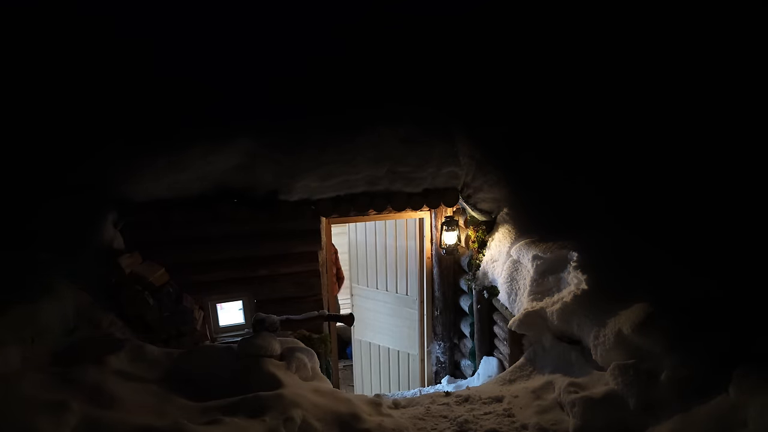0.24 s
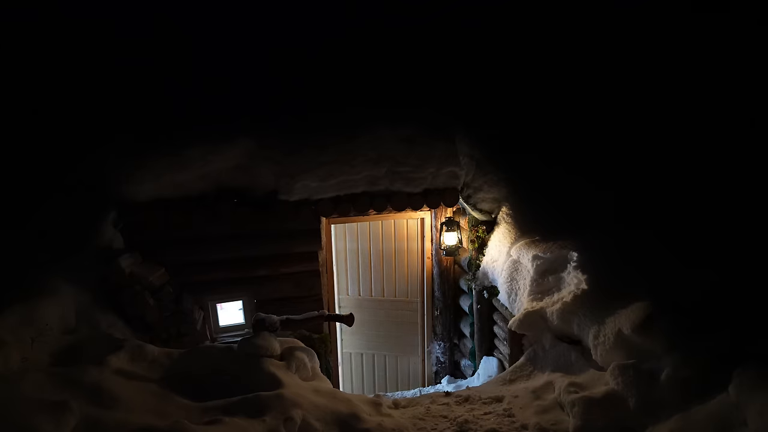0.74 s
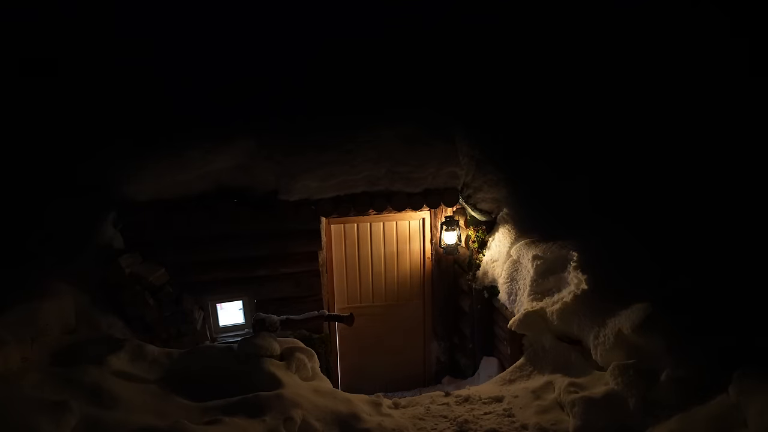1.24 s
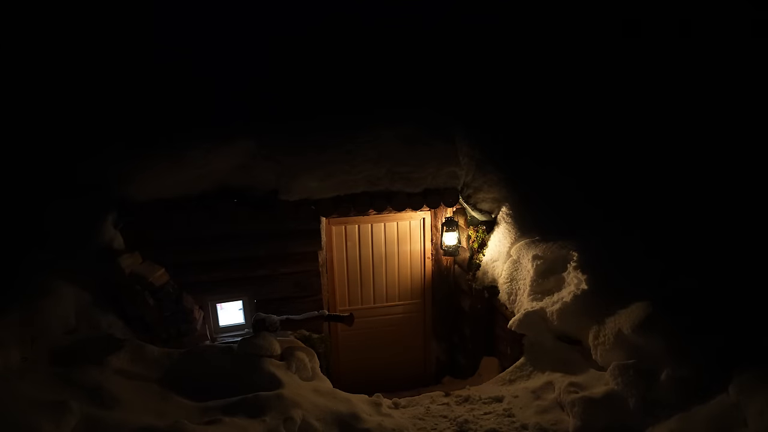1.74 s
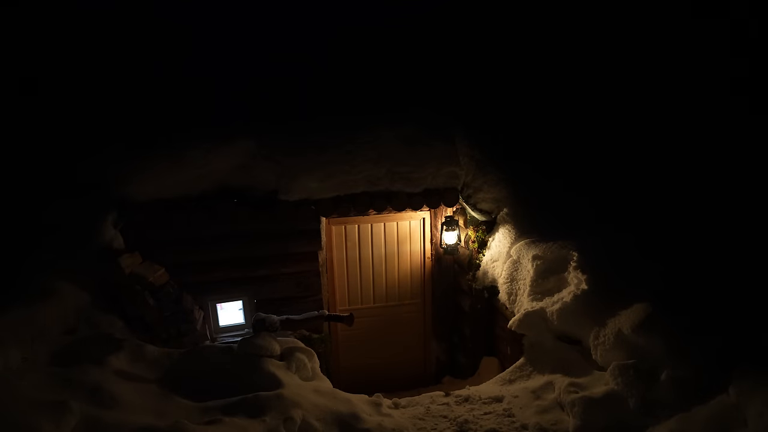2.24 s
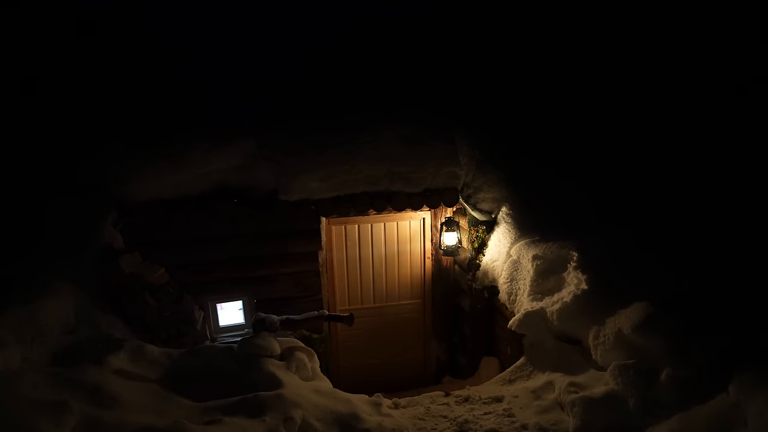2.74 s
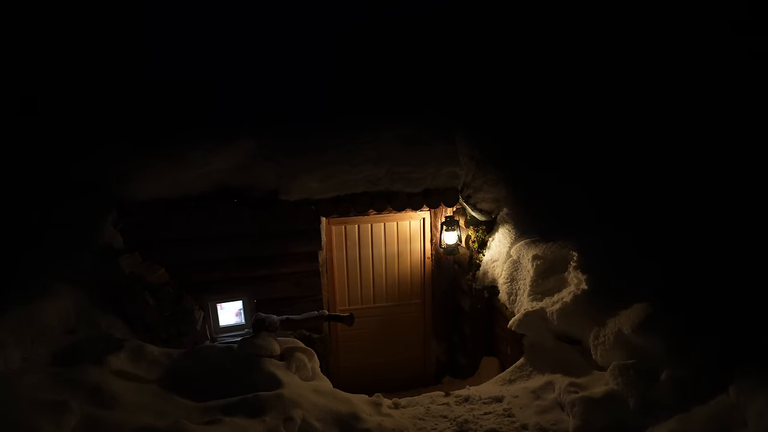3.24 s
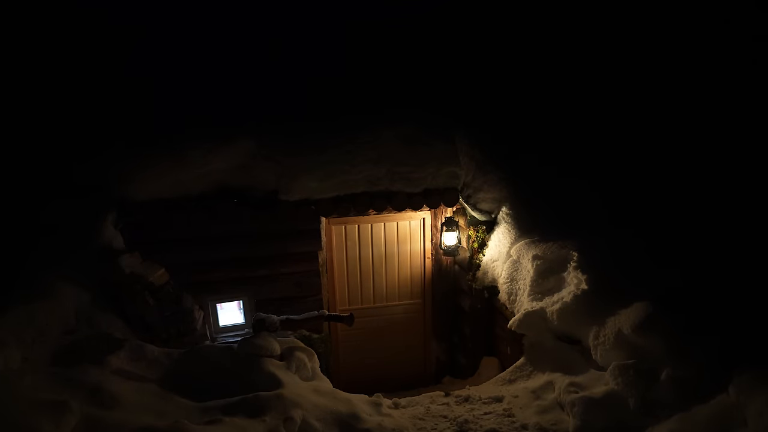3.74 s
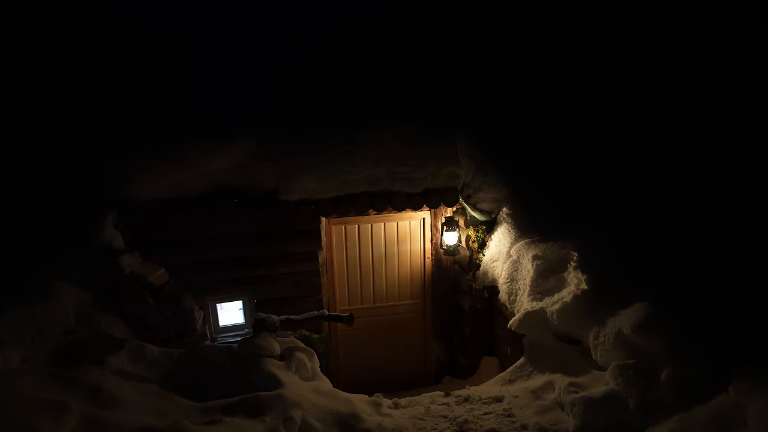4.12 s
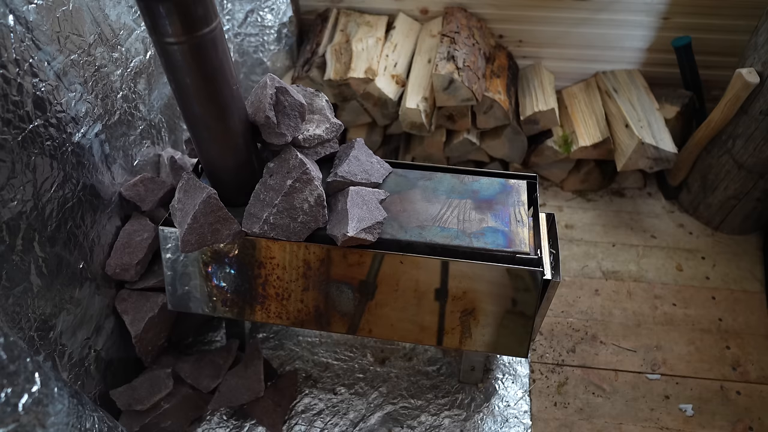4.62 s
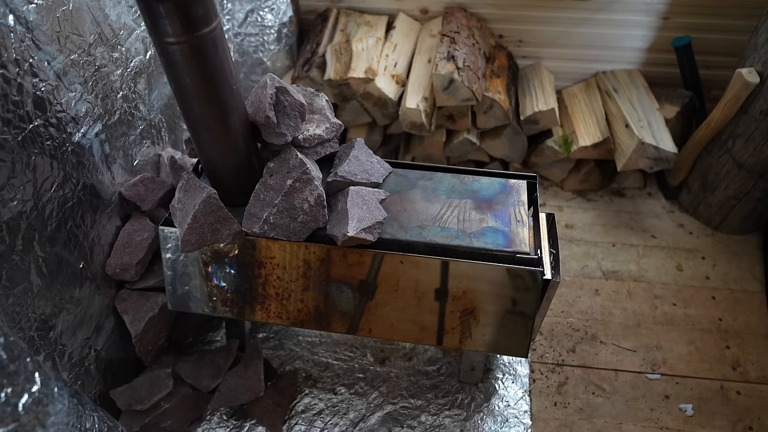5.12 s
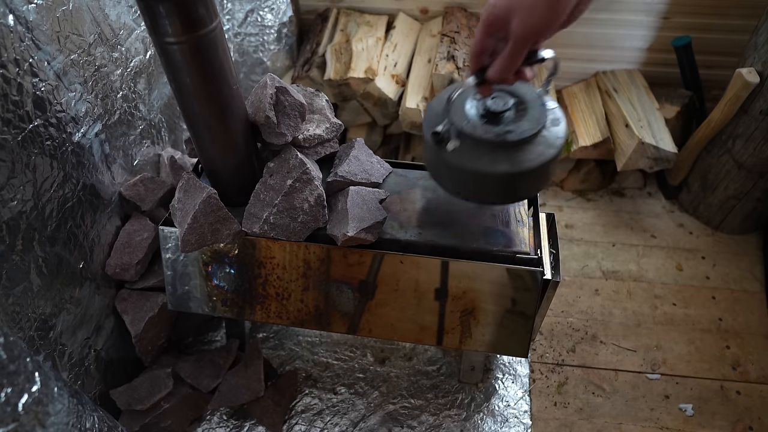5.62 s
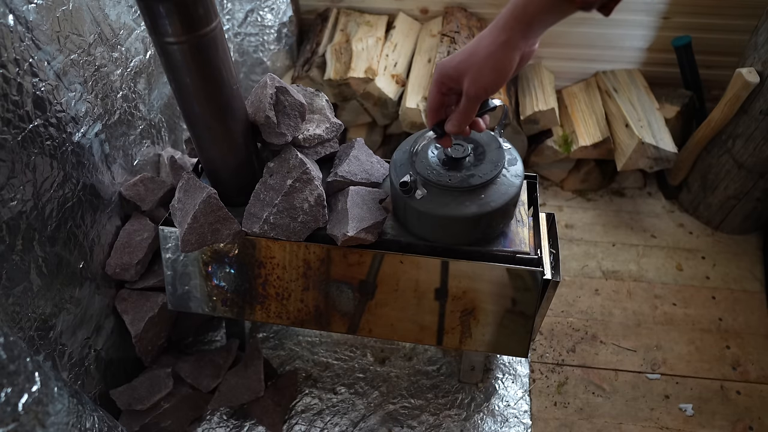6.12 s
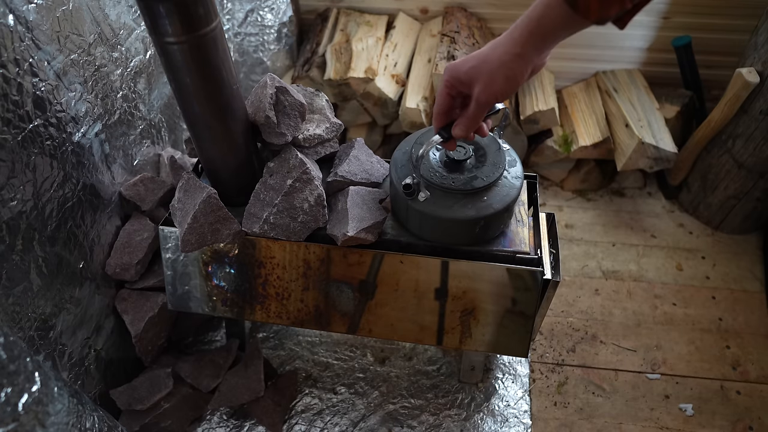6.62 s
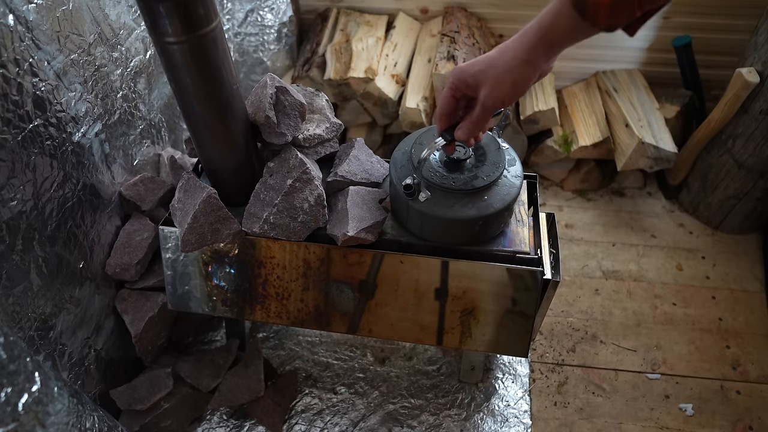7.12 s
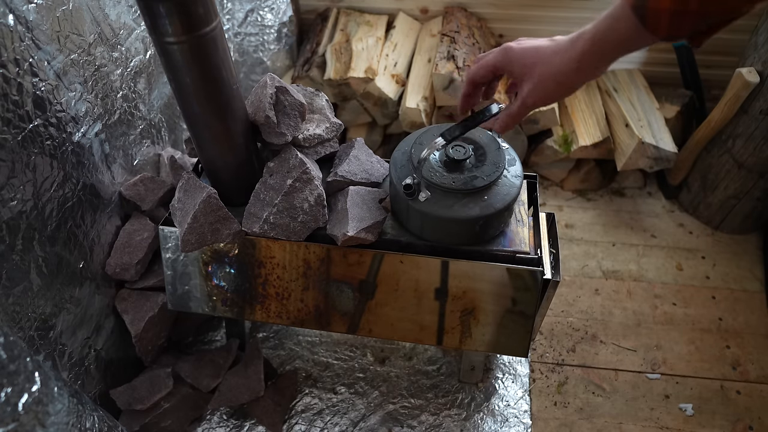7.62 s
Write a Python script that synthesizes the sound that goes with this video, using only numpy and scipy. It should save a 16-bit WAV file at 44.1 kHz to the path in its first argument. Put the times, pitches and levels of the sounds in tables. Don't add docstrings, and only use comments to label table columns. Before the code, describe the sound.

Very quiet start with low rumble, boots in snow and brittle ticks, then a heavy wooden door thumps twice, its edge juddering against the frame. Quiet settling follows. The scene jumps inside to a small room with faint fire and sleeve rustle, a step on boards, and a kettle set on hot metal: steam erupts, hissing, spitting and crackling in uneven surges, with a hard knock near the end. Close and dry, in stereo.

```python
import sys
import numpy as np
from scipy import signal
from scipy.io import wavfile

SR = 44100
rng = np.random.default_rng(int(sys.argv[2]) if len(sys.argv) > 2 else 0)


def makeup_ratio(level_db):
    decades = np.asarray(level_db, float) / 20
    return 10 ** decades


def master_out(mix):
    frames = np.transpose(np.atleast_2d(mix))
    ceiling = np.clip(frames, -1, 1)
    pcm = np.round(ceiling * 32767).astype(np.int16)
    wavfile.write(sys.argv[1], SR, pcm)


N = 347067
CUT_S = 4.24

# peak time in seconds, peak in dB, rise in seconds,
# fall in seconds per 20 dB, fine fizz against the jet in dB.
FLASHES = [(5.8435, -25.5, .005, 0.4, 0), (5.97, -30.5, .12, .35, -1), (6.095, -32, .04, 0.3, -7),
           (6.194, -22, 0.04, 0.2, -6), (6.225, -22.5, .06, .2, -7), (6.305, -24.5, 0.17, 0.34, -4),
           (6.455, -26.5, .05, 0.21, 5), (6.56, -28.5, 0.28, 0.25, -2), (6.64, -26.5, 0.1, .17, -4.5),
           (6.739, -25.5, .012, 0.24, -2), (6.94, -36, .12, .45, 0.3), (7.012, -27, .012, .1, 1),
           (7.036, -23.5, .06, .18, -0.6), (7.19, -29.5, .1, 0.44, -5), (7.33, -33, 0.33, 0.7, 5),
           (7.51, -28, 0.2, 0.32, 1.5), (7.59, -32, .05, .2, 10), (7.647, -22.5, .1, 0.11, -1),
           (7.73, -27, 0.15, 0.2, -2), (7.82, -28.5, .25, .62, 4.5)]
# time in seconds, peak in dB.
SPITS = [(6.3134, -8), (6.347, 3), (6.385, 2), (6.463, -2), (6.175, 1), (6.201, -6), (6.226, -4),
         (6.525, -10), (6.575, -8), (6.64, -8), (6.897, -20), (7.27, -10), (7.497, -8), (7.523, -10),
         (7.735, -8), (6.927, -10), (7.008, -3), (7.037, -3), (6.9471, -9), (7.3427, -29), (7.5822, -37),
         (7.7024, -22), (7.8594, -20)]
# time in seconds, drive in dB.
PRESS = [
    (5.9, -2.5),
    (6.22, 3),
    (6.7, 1),
    (6.9, 7.5),
    (7.15, -3.5),
    (7.55, -5),
    (7.72, 2.5),
]
# frequency in Hz, level in dB per Hz.
JET = [(35, -54), (60, -34), (165, -11), (271, -22), (363, -12), (596, -15.5), (1250, -5), (1430, -5),
       (1720, -14), (2100, -5), (2600, -5.5), (3300, -4), (13000, -5.5)]
# frequency in Hz, correlation from -1 to 1.
JET_ALIKE = [(60, 0.99), (180, 1), (550, 0.91), (1650, 0.61), (4970, 0.27), (15000, 0.04)]
# frequency in Hz, width in Hz,
# level in dB, centre in seconds, spread in seconds.
KETTLE_AND_PLATE = [(3760, 22, 0, 6.5, 0.27), (1090, 90, 10, 6.235, 0.04), (1245, 22, 6, 6.5, 0.4),
                    (1246, 14, 16, 7.4, 0.55), (1680, 93, 4, 6.4, 0.3), (2140, 98, 6, 5.92, 0.089),
                    (3080, 40, 5, 6.6, 0.2), (3060, 45, 4, 7.3, .5), (5200, 200, 3, 7.62, .1),
                    (2900, 500, 0, 6.4, .1), (3420, 60, 4, 5.9, .07), (3100, 40, -3, 6.5, 0.13),
                    (3260, 100, -3, 7.66, 0.05), (5300, 260, 3, 6.57, 0.2), (970, 110, 8, 7.06, 0.045),
                    (430, 40, 4, 5.95, .1), (1000, 150, 3, 5.95, .12), (1500, 200, 3, 5.9, .08),
         (780, 120, 9, 7.715, .025), (370, 60, 10, 7.72, .03), (200, 60, 6, 7.2, .2),
         (175, 30, 5, 6.27, .06), (430, 30, 3, 6.33, .12), (1240, 60, 6, 6.23, .04),
         (980, 40, 6, 6.36, .04), (1150, 50, 6, 6.36, .04), (340, 40, 4, 6.43, .04), (775, 25, 6, 6.55, .1),
         (400, 60, 5, 6.635, .015), (1000, 250, 5, 6.738, .01), (450, 60, 8, 6.8, .04),
         (670, 50, 6, 6.81, .04), (1750, 60, 3, 6.8, .08), (430, 60, 5, 6.945, .02),
         (1150, 60, 4, 6.96, .03), (1720, 120, 2, 7.02, .02), (1000, 200, 5, 7.5, .012),
         (950, 100, 3, 7.835, .02)]
# frequency in Hz, width in Hz, level in dB.
KETTLE_WALLS = [(1750, 22, -2), (2230, 25, -10), (3020, 40, -2), (3430, 30, -7), (3775, 30, -3),
                (4460, 60, -7), (4830, 45, -3), (5185, 60, -1), (5405, 35, -1), (5940, 50, -6),
                (6690, 60, -5), (8035, 30, -1), (8880, 40, -7), (13690, 60, -2)]
FIZZ_FALL = 0.79
PLATE_LAG_S, BODY_LAG_S = 0.044, 0.018


def steam():
    wet = slice(int(5.8 * SR), N)
    flow = bursts(FLASHES)[0]
    fine, fine_db = bursts(FLASHES, FIZZ_FALL)
    press_db = np.interp(np.arange(N) / SR, *np.transpose(PRESS))
    plate_db = press_db + 1.3 * lagging_db(flow, PLATE_LAG_S)
    body_db = 0.8 * lagging_db(flow, BODY_LAG_S)

    frying = grains(3000, spread_db=4.2)
    jet = bands(JET, JET_ALIKE, (5.8, 8), patchy_db=1.36, flicker=22.0, grit=.5 * frying,
                tilt=[(300, plate_db), (1300, body_db), (4000, 0 * body_db)])
    close = .7 * jet[:, wet] + .3 * jet[::-1, wet]
    ringing = sum(makeup_ratio(level_db) * resonance(close, hz, width) for hz, width, level_db in KETTLE_WALLS)
    jet[:, wet] = waking(jet[:, wet], 5.8, KETTLE_AND_PLATE) + ringing
    jet = signal.sosfilt(signal.butter(2, 55, "high", fs=SR, output="sos"), jet)

    small = decaying(np.abs(grains(90, spread_db=2.5)), 0.0052)
    sputter = makeup_ratio(0.7 * drift(60.)) + 0.17 * np.minimum(small / np.std(small), 3)
    kicks = np.zeros(N)
    kicks[[round(s * SR) for s, _ in SPITS]] = makeup_ratio(np.array(SPITS)[:, 1] - 23)
    spits = decaying(kicks, 0.0073)

    fizz = rng.standard_normal((2, N)) + 0.9 * frying
    fizz = rms_one(signal.sosfilt(signal.butter(4, 13000, "high", fs=SR, output="sos"), fizz))
    fizz_gain = fine * makeup_ratio(fine_db + 3.3 + 2.0 * drift(45.)) * sputter
    fizz = fizz_gain * fizz * makeup_ratio([[-.7], [.7]])
    return (flow * sputter * makeup_ratio(1.4) + spits) * jet + fizz


# start in seconds, peak in dB, frequency in Hz,
# hold in seconds, contact in seconds.
BOOMS = [(1.449, -11.5, 60.8, 0.056, 0.005), (1.519, -30, 62.7, 0.25, 0.0041),
         (1.672, -7.5, 46.5, 0.039, 0.0063), (1.756, -27, 62, 0.024, 0.0035),
         (1.88, -21, 78.6, 0.081, 0.031), (2.201, -33, 95.5, 0.046, 0.0091),
         (5.203, -28, 205, 0.0096, 0.0011), (5.365, -13.5, 196, 0.017, 0.004),
         (5.389, -22.5, 196, 0.02, 0.003), (6.41, -36, 171.3, 0.083, 0.0028),
         (7.03, -34.5, 170.6, 0.058, 0.0024)]
# peak time in seconds, peak in dB, rise in seconds,
# fall in seconds per 20 dB.
SHUDDER = [
    (1.452, -28.5, 0.013, 0.09),
    (1.655, -41, .06, 0.05),
    (1.676, -21, 0.017, 0.0568),
    (1.9, -48, 0.44, 0.14),
]
# frequency in Hz, width in Hz, level in dB.
WALL_PEAKS = [(120, 24, 1), (190, 98, -1.5), (239, 49, 0.5), (318, 21, -12), (454, 44, -5.5), (560, 90, -8)]
# peak time in seconds, peak in dB, rise in seconds,
# fall in seconds per 20 dB.
DRAG = [(1.446, -43, .005, .05), (1.477, -35, .012, 0.03), (1.632, -34.5, 0.045, 0.05),
        (1.668, -41, 0.003, 0.04), (1.524, -51, .012, .04), (1.59, -51, .03, .1), (1.718, -44, 0.005, 0.03),
        (1.737, -44, .012, .02), (1.758, -51, .01, .04), (1.781, -47, 0.004, 0.16),
        (1.86, -40.5, 0.085, 0.08), (1.915, -38, 0.11, 0.025), (1.944, -41, 0.002, 0.02)]
# frequency in Hz, width in Hz, level in dB.
DRAG_PEAKS = [(830, 450, -14.5), (1120, 100, -6), (1630, 260, -3), (2300, 280, -7), (2610, 180, -4.5),
              (3450, 730, -10.5), (4120, 230, -9.5), (4740, 110, 0)]
# frequency in Hz, width in Hz, level in dB,
# centre in seconds, spread in seconds.
LATCH = [(1550, 200, 8, 1.452, .008), (2700, 300, 0, 1.46, .02), (1950, 300, 7, 1.484, .008),
         (1520, 150, 9, 1.638, .02), (3400, 400, 2, 1.63, .015), (2650, 200, 5, 1.59, .02),
         (1100, 900, 12, 1.67, .008), (1650, 150, 3, 1.87, .05), (3450, 200, 5, 1.72, .01)]
WEDGE_RISE, SAG = 3.4, -.45


def door():
    booms = sum(struck(*boom, SAG if k else WEDGE_RISE) for k, boom in enumerate(BOOMS))
    walls = bursts(SHUDDER)[0] * makeup_ratio(-1.5) * through(rng.standard_normal(N), WALL_PEAKS)

    catch_count = np.floor(np.cumsum(300 * makeup_ratio(1.5 * drift(60.)) / SR))
    catches = np.diff(catch_count, prepend=0) * rng.uniform(0.21, 1, N)
    slips = 0.64 * rms_one(catches) + .5 * grains(1500, spread_db=3.0) + 0.49 * rng.standard_normal(N)
    edge = through(slips, DRAG_PEAKS)
    edge = signal.sosfilt(signal.cheby2(6, 30, 5100, fs=SR, output="sos"), edge)
    edge[:2 * SR] = waking(edge[:2 * SR], 0, LATCH)
    spray = makeup_ratio(-13) * rms_one(resonance(slips, 6500, 3300))
    spray *= np.arange(N) < 1.75 * SR
    return booms + walls + bursts(DRAG)[0] * makeup_ratio(-1.0) * (rms_one(edge) + spray)


def struck(s, peak_db, hz, hold, contact, rise):
    out, at = np.zeros(N + SR), round(s * SR)
    t = np.arange(SR // 2) / SR
    envelope = np.exp(-(t / hold) ** 2) * (1 - np.exp(-t / contact))
    out[at:at + len(t)] = -makeup_ratio(peak_db) * envelope * np.sin(2 * np.pi * hz * t * (1 + rise * t))
    return out[:N]


# time in seconds, peak in dB, crack in dB, hardness in dB per octave.
KNOCKS = [(0.368, -33, -22, -4), (0.397, -38, -11, -8), (1.007, -44, -24, -19.5), (1.047, -52, 3, -5),
          (1.45, -27.5, -30, -3), (1.482, -36, 4, -16), (1.666, -30, -5, -1), (1.944, -43, 9.5, -6),
          (2.024, -51, -5, 1), (2.195, -38.5, -17.5, -10), (2.588, -47.5, -11, 2.5),
          (2.715, -45.5, -14, -14), (3.015, -51, -30, 1), (3.41, -50, -30, -8), (3.18, -39.5, -26, 2),
          (3.53, -46, -9, -1), (3.722, -46, -17, -5), (4.039, -41, -10.5, -16), (4.244, -39.5, -8, -8.5),
          (4.29, -26, -11, -7.5), (5.36, -24, -15, -5), (7.691, -13, -22, 2), (7.705, -13, -6.5, 0.5)]
# frequency in Hz, level in dB, 60 dB decay time in seconds.
PLANKS = [(233, -9.5, 0.029), (344, -1.5, 0.084), (477, -12.5, 0.09), (725, 0, 0.06), (914, -3, 0.035),
          (1130, -2.5, 0.032)]


def knocks():
    s, peak_db, crack_db, hardness = np.array(KNOCKS).T
    at, out = [round(k * SR) for k in s], np.zeros(N)
    for hz, level_db, t60 in PLANKS:
        chance_db = rng.normal(0, 4.1, len(at))
        strike_db = peak_db + level_db - 11 + hardness * np.log2(hz / 500) + chance_db
        clicks = np.full(N, 1e-18)
        clicks[at] = makeup_ratio(strike_db) * rng.choice([-1, 1], len(at))
        r, w = makeup_ratio(-60 / (t60 * SR)), 2 * np.pi * hz / SR
        out += signal.lfilter([0, np.sin(w)], [1, -2 * r * np.cos(w), r * r], clicks)
    blows = np.full(N, 1e-18)
    blows[at] = makeup_ratio(peak_db + crack_db - 4.0)
    splinters = rms_one(resonance(rng.standard_normal(N), 1400, 2000))
    out += decaying(blows, 0.0053) * splinters
    return signal.sosfilt(signal.butter(2, [170, 4500], "band", fs=SR, output="sos"), out)


# peak time in seconds, peak in dB, rise in seconds, fall in seconds per 20 dB,
# brightness in dB.
BOOTS = [(.12, -69, .6, 0.4, 14.5), (.366, -46, .006, 0.05, -14), (1.048, -57, .043, 0.2, -17),
         (2.2, -47, 0.01, 0.03, -12), (2.225, -52, .03, .08, -9), (3.184, -44, 0.0089, .085, -11),
         (3.532, -50, .01, 0.1, -14), (3.59, -46, .03, .08, -11), (3.638, -44, 0.04, 0.06, -9),
         (4.1, -64, .02, 0.15, 5), (4.2, -63, .04, .06, 6)]
# frequency in Hz, level in dB per Hz.
SNOW = [(88, -44), (150, -11), (832, -16), (941, -26), (1280, -12.5), (1750, -25.5), (2690, -27),
        (6000, -44), (7800, -62), (13200, -120)]


def boots():
    gain, bright_db = bursts(BOOTS)
    crunch = bands(SNOW, JET_ALIKE, (0, 4.3), patchy_db=4.5, flicker=15.0,
                   grit=0.14 * grains(700, spread_db=4.0), tilt=[(500, 0 * bright_db), (2000, bright_db)])
    return gain * makeup_ratio(4.5) * crunch


# peak time in seconds, peak in dB, rise in seconds,
# fall in seconds per 20 dB, lows in dB.
MOVES = [(4.245, -51, 0.004, 0.13, 2.1), (4.291, -43, .02, 0.08, 4), (4.62, -45.5, .14, .5, -12),
         (4.884, -46, 0.02, 0.03, -9), (5.15, -58.5, 0.14, 2, -16), (5.172, -44, .01, .05, 0),
         (5.196, -37.5, 0.012, 0.05, -3), (5.224, -37, 0.018, 0.04, -2), (5.302, -44, .015, .1, 5),
         (5.33, -39, 0.05, 0.06, 0), (5.362, -44, .006, .13, 9), (5.27, -49, .1, .1, 0),
         (5.535, -50, .015, .08, 3), (5.5, -49.5, 0.25, 0.4, -2), (5.645, -44, .025, .08, -4),
         (5.74, -52, .25, 0.7, -2.5)]
# frequency in Hz, level in dB per Hz.
ROOM_TONE = [(88, -35), (150, -7.5), (205, -12), (270, -13.5), (334, -4.5), (431, -10), (1120, -7.5),
             (1360, -7), (1830, -8.5), (16000, -15.5)]
# frequency in Hz, correlation from -1 to 1.
ROOM_ALIKE = [(60, 0.99), (180, 0.98), (550, 0.71), (1650, -0.13), (4970, 0.068), (15000, -0.19)]
# frequency in Hz, width in Hz, level in dB,
# centre in seconds, spread in seconds.
HANDLE = [(1150, 120, 8, 5.215, .03), (1850, 150, 8, 5.215, .03), (3100, 250, 3, 5.205, .025),
          (750, 150, 6, 5.18, .03), (11000, 2500, 6, 5.19, .09), (1200, 250, 5, 5.33, .03),
          (3050, 300, 4, 5.325, .02), (300, 160, 8, 5.42, .035), (370, 90, 9, 5.5, .02),
          (1000, 400, 7, 5.5, .015), (560, 120, 6, 5.545, .02), (1400, 500, 7, 5.535, .012),
          (350, 80, 10, 5.66, .04), (1100, 300, 7, 5.65, .02), (3000, 200, 7, 5.64, .015),
          (12000, 6000, 9, 5.645, .02), (10000, 8000, 2, 5.6, .2), (5600, 500, 8, 4.884, .01),
          (400, 100, 8, 5.78, .02), (1050, 60, 7, 4.68, .08)]
FIRE_DB, FIRE_LOWS_DB, DULL_PER_DB = -59.5, -6.5, 0.47


def indoors():
    fire = (CUT_S, FIRE_DB, .01, 100, FIRE_LOWS_DB)
    gain, lows_db = bursts(MOVES + [fire])
    highs_db = -DULL_PER_DB * np.maximum(20 * np.log10(gain), FIRE_DB)
    rustle = bands(ROOM_TONE, ROOM_ALIKE, (4.2, 5.9), patchy_db=1.0, flicker=31.0,
                   grit=0.31 * grains(1200, spread_db=3.0),
                   tilt=[(450, lows_db), (2000, 0 * lows_db), (10000, highs_db)])
    near = slice(int(4.2 * SR), int(5.9 * SR))
    rustle[:, near] = waking(rustle[:, near], 4.2, HANDLE)
    return gain * makeup_ratio(4.5) * rustle


# time in seconds, peak in dB, left minus right in dB, body below the bright edge in dB.
TICKS = [(0.139, -43, -0.5, -17), (0.334, -39, -1.0, -20), (0.626, -35, 3, -12), (0.7053, -43, 2.0, -20),
         (0.7194, -40, -3.0, -23), (0.7931, -38, -5, -15), (1.083, -34, -5.5, -21), (1.1108, -40, 1.0, -21),
         (1.1464, -36.5, -6.5, -22), (1.1575, -33.5, -14, -11), (2.599, -35, -8, -9),
         (2.629, -37, 1.5, -18), (3.03, -41, -2.5, -17), (3.11, -38, -8, -20), (3.238, -38, -7, -23),
         (3.6171, -45, 4.0, -23), (3.89, -36, -4.5, -18)]


def ticks():
    edge, body = np.full((2, 2, N), 1e-18)
    for s, peak_db, pan_db, body_db in TICKS:
        at = round(s * SR)
        sides = makeup_ratio(peak_db + 12.0 + np.c_[[pan_db / 2, -pan_db / 2]])
        edge[:, [at, at + 14]] += sides * [1, -.4]
        body[:, [at]] += sides * makeup_ratio(body_db + 6.0)
    edge = signal.sosfilt(signal.butter(3, 9500, "high", fs=SR, output="sos"), edge)
    return edge + signal.sosfilt(signal.butter(2, [2500, 9500], "band", fs=SR, output="sos"), body)


# frequency in Hz, width in Hz, level in dB.
DRAUGHT = [(659, 23, -76.5), (1036, 46, -77), (1740, 61, -71)]


def draught():
    out = np.zeros(N)
    inside = (np.arange(N) / SR > CUT_S) * 1.
    for k, (hz, width, level_db) in enumerate(DRAUGHT):
        tone = rms_one(resonance(rng.standard_normal(N), hz, width))
        out += makeup_ratio(level_db + 2.2 * drift(10.0)) * tone * (inside if k else 1)
    return out


# peak time in seconds, peak in dB, rise in seconds,
# fall in seconds per 20 dB.
RUMBLE = [(0.42, -53, .5, 0.25), (1.3, -58, 1.0, 0.5), (2.01, -46, .04, 0.36), (2.24, -49.5, .15, 0.36),
          (2.9, -59.5, 0.97, 0), (3.75, -55, 0.87, .25), (4.15, -54, .4, 0.7), (5.2, -46, .04, .2),
          (5.38, -44, 0.08, 0.15), (5.7, -59, .15, .2), (1.05, -56, .06, .2), (2.5, -55, .08, .2),
          (3.2, -54, .05, .25), (6.21, -62, .1, .6), (7.05, -59, 0.2, .4)]
# frequency in Hz, level in dB per Hz.
RUMBLE_TONE = [(12, -34), (20, 0), (49, -1.5), (86, -3.5), (130, -8), (173, -34), (250, -25.5), (320, -12),
               (550, -120)]
# frequency in Hz, correlation from -1 to 1.
NIGHT_ALIKE = [(60, 1), (180, 1), (550, -0.31), (1650, 0.21), (4970, 0.15), (15000, -0.051)]
STILL_DB, INDOOR_CALM_DB = -69, 5.5


def rumble():
    still = makeup_ratio(STILL_DB - INDOOR_CALM_DB * (np.arange(N) / SR > CUT_S))
    lows = bands(RUMBLE_TONE, NIGHT_ALIKE, (0, 8), patchy_db=5.0, flicker=3.3)
    return (bursts(RUMBLE)[0] + still) * lows


# frequency in Hz, level in dB per Hz.
NIGHT = [(88, -31), (150, -1), (190, 0), (566, -11), (675, -11), (821, -19), (1240, -22), (4000, -20),
         (6640, -14), (15100, -12), (16000, -15)]
NIGHT_DB = -58


def night():
    return makeup_ratio(NIGHT_DB + 3.0) * bands(NIGHT, NIGHT_ALIKE, (0, 4.3), patchy_db=0.64, flicker=3.2)


def bands(spectrum, alike, span, patchy_db, flicker, grit=0., tilt=None):
    a, b = (min(int(s * SR), N) for s in span)
    out, edges = np.zeros((2, N)), 20 * 2 ** np.arange(0, 10, .5)
    white = rng.standard_normal((2, 2, b - a)) + (grit + np.zeros(N))[a:b] * [[1], [.6]]
    for k, (low, high) in enumerate(zip(edges, np.append(edges[1:], 17500))):
        hz = np.sqrt(low * high)
        if not spectrum[0][0] <= hz <= spectrum[-1][0]:
            continue
        mid, side = signal.sosfilt(signal.butter(2, [low, high], "band", fs=SR, output="sos"), white[k % 2])
        like = np.clip(at_hz(alike, hz), -1, 1)
        level_db = at_hz(spectrum, hz) + patchy_db * drift(flicker)[a:b]
        if tilt:
            anchors = np.log([p[0] for p in tilt])
            for row, (_, curve) in zip(np.eye(len(tilt)), tilt):
                share = np.interp(np.log(hz), anchors, row)
                level_db = level_db + share * (curve[a:b] - np.mean(curve[a:b]))
        stereo = np.sqrt(1 + like) * mid + np.sqrt(1 - like) * side * [[1], [-1]]
        out[:, a:b] += makeup_ratio(level_db) * stereo
    return out / np.sqrt(np.mean(out[:, a:b] ** 2))


def bursts(rows, fall_share=0.96):
    t = np.arange(0, N + 32, 32) / SR
    s, peak_db, rise, fall, *own = np.transpose(rows)[:, :, None]
    below_peak = np.maximum((s - t) / rise, (t - s) / (fall * fall_share))
    power = makeup_ratio(2 * np.maximum(peak_db - 20 * below_peak, -300))
    total = power.sum(axis=0)
    curves = [np.sqrt(total)] + [(power * v).sum(axis=0) / total for v in own]
    return [np.interp(np.arange(N) / SR, t, c) for c in curves]


def resonance(x, hz, width):
    r = np.exp(-np.pi * width / SR)
    return signal.lfilter([(1 - r * r) / 2, 0, (r * r - 1) / 2],
                          [1, -2 * r * np.cos(2 * np.pi * hz / SR), r * r], x)


def through(x, peaks):
    return rms_one(sum((-1) ** k * makeup_ratio(level_db) * resonance(x, hz, width)
                       for k, (hz, width, level_db) in enumerate(peaks)))


def waking(x, start_s, table):
    t = start_s + np.arange(x.shape[-1]) / SR
    return x + sum(makeup_ratio(level_db) * np.exp(-((t - s) / spread) ** 2) * resonance(x, hz, width)
                   for hz, width, level_db, s, spread in table)


def decaying(x, fall_s):
    return signal.lfilter([1], [1, -np.exp(-1 / (fall_s * SR))], x)


def lagging_db(gain, lag_s):
    r = np.exp(-1 / (lag_s * SR))
    follower = signal.lfilter([1 - r], [1, -r], gain)
    return np.clip(20 * np.log10(follower / gain + 1e-9), -25, 12)


def grains(per_s, spread_db):
    sizes = makeup_ratio(spread_db * np.minimum(rng.exponential(1, N), 5)) * rng.choice([-1, 1], N)
    return rms_one(sizes * (rng.random(N) < per_s / SR))


def drift(rate):
    r = np.exp(-40 * np.pi * rate / SR)
    slow = signal.lfilter([1], [1, -2 * r, r * r], rng.standard_normal(N // 20 + 3002))[3000:]
    return np.interp(np.arange(N) / 20, np.arange(len(slow)), rms_one(slow))


def at_hz(points, hz):
    points = np.array(points)
    return np.interp(np.log(hz), np.log(points[:, 0]), points[:, 1])


def rms_one(x):
    return x / np.sqrt(np.mean(x ** 2) + 1e-20)


# time in seconds, left minus right in dB.
LEAN = [
    (0.0, -2.4),
    (6.8, -1.55),
    (7.2, -2.5),
]


def scene():
    wood = door() + knocks() + draught()
    echo = makeup_ratio(-21) * np.roll(wood, 260) + makeup_ratio(-1) * np.roll(np.diff(wood, prepend=0), 90)
    lean_db = np.interp(np.arange(N) / SR, *np.transpose(LEAN))
    airy = (night() + boots() + indoors() + steam()) * makeup_ratio(np.array([lean_db / 2, -lean_db / 2]))
    return wood + echo * [[1], [-1]] + ticks() + rumble() + airy


def roll_off(x):
    return signal.sosfilt(signal.butter(12, 17030, fs=SR, output="sos"), x)


def record(dry):
    rounded = .8 * np.tanh(dry / .8)
    mix = signal.sosfilt(signal.ellip(12, .2, 70, 15730, fs=SR, output="sos"), rounded)
    return roll_off(mix)


dry = scene()
out = record(dry)
master_out(out)
```